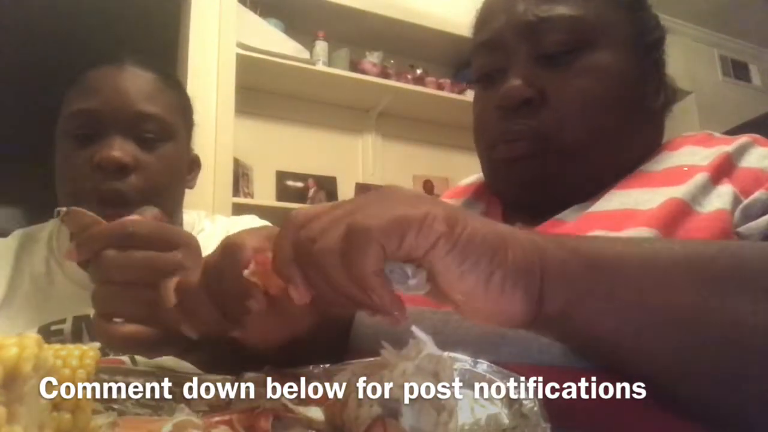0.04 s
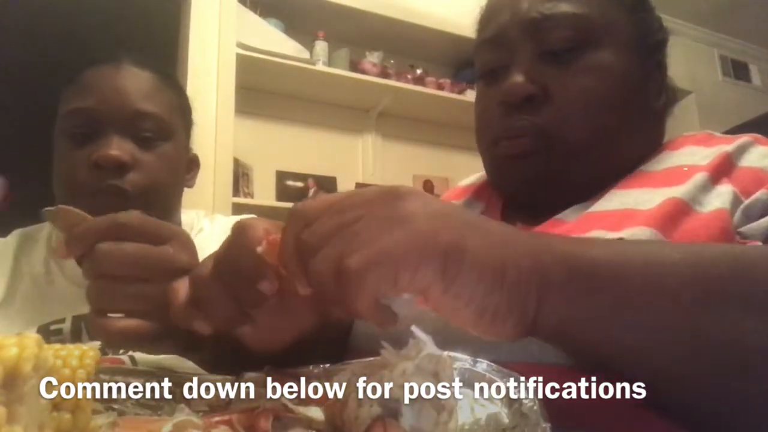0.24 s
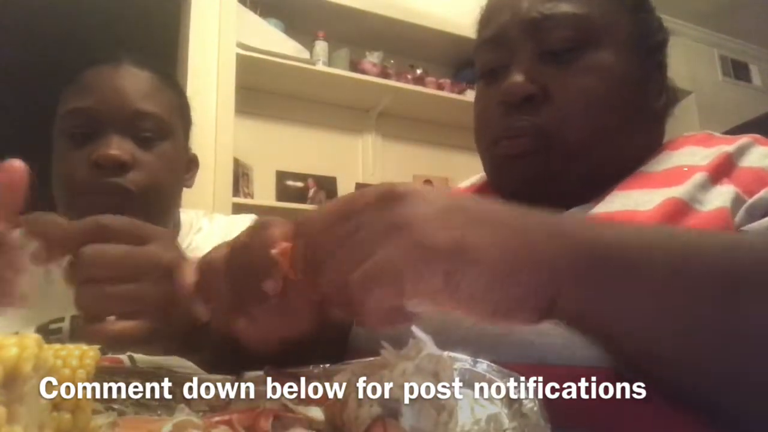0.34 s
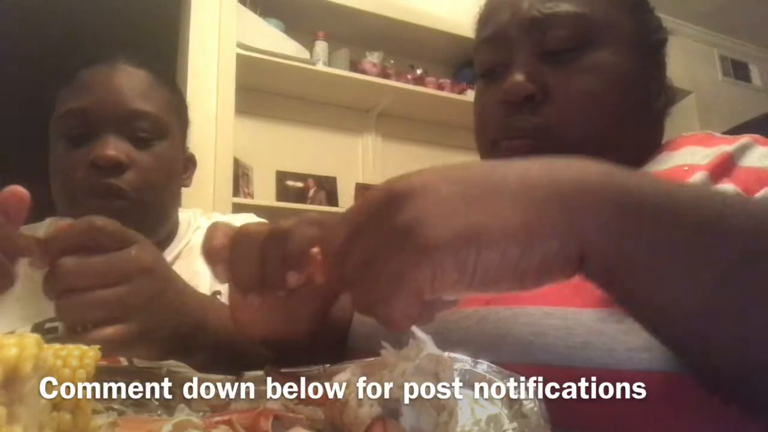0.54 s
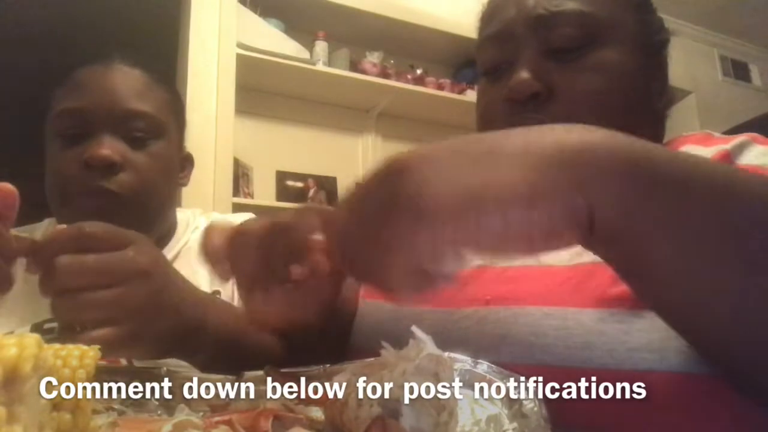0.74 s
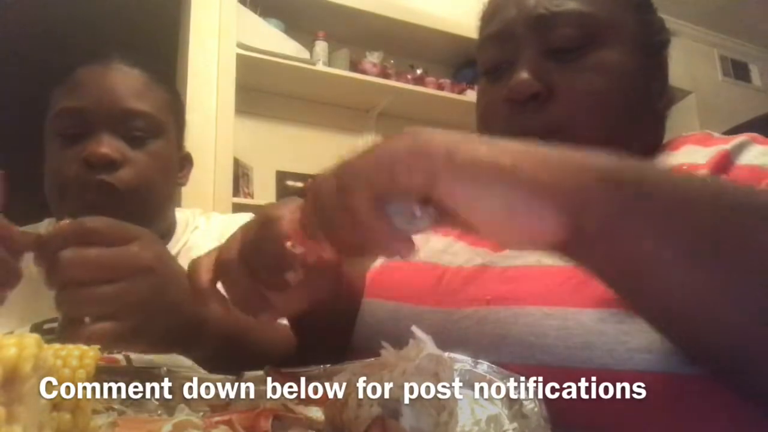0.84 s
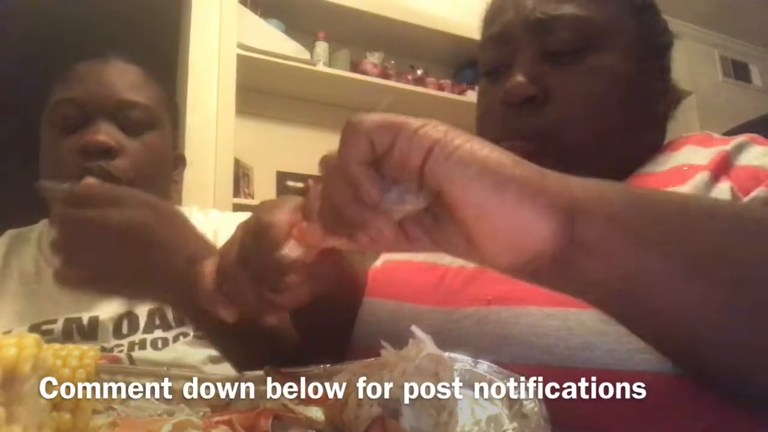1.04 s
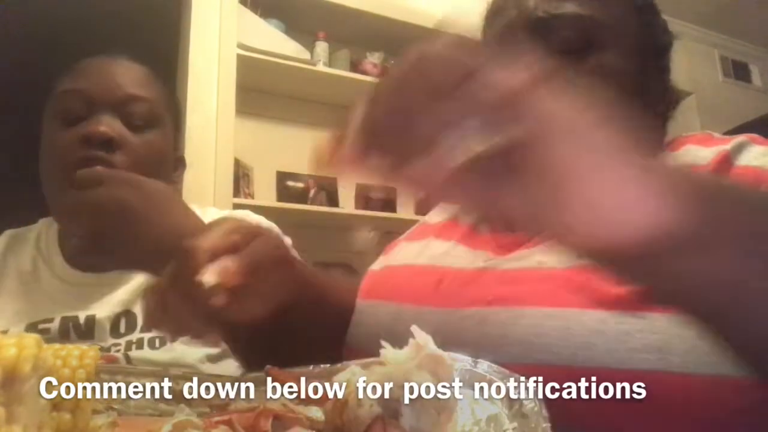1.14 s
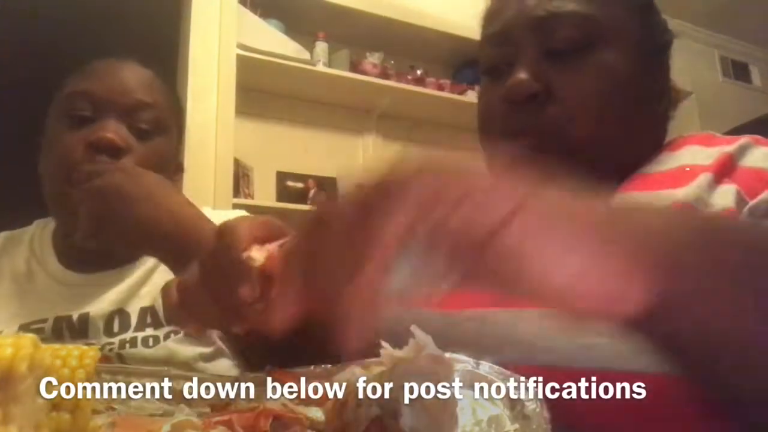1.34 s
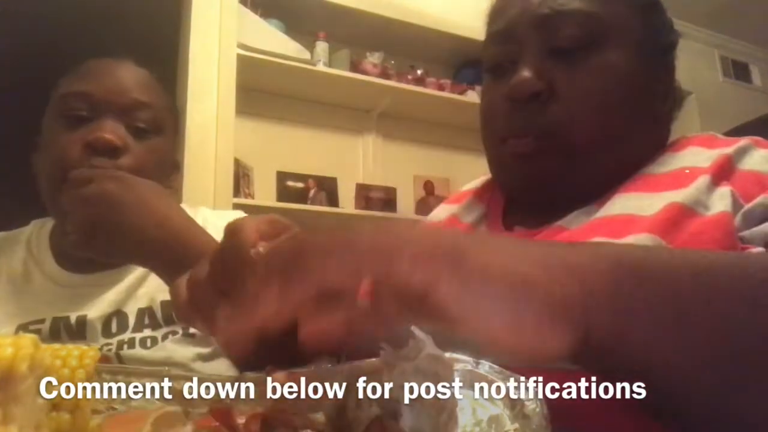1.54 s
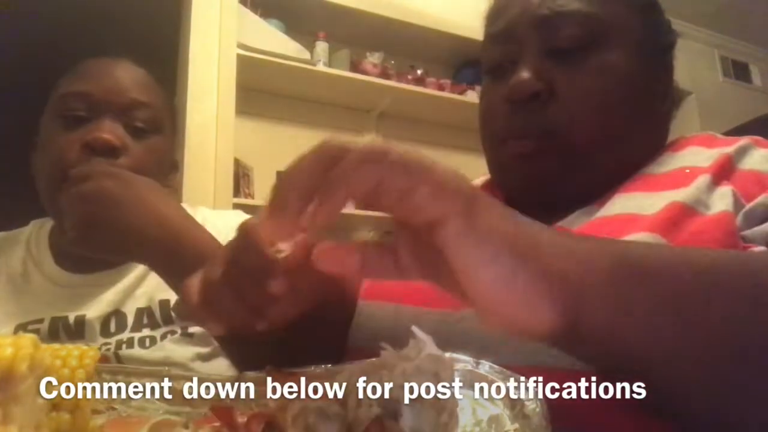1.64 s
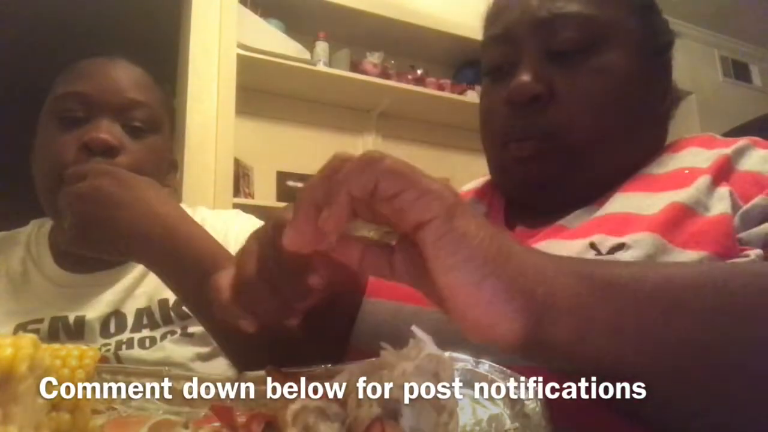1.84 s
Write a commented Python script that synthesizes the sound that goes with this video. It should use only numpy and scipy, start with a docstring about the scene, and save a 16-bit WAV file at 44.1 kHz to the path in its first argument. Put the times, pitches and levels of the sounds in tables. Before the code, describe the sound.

Crab-like shells snapped by hand at a table, one sharp double crack, later dropped bits clattering

```python
"""Shellfish shells cracked at a table

Shellfish shells snap in the fingers at a dining table, close to a phone; pieces drop onto a heap of shells.
Each snap or drop is a short run of noisy fractures ringing the shell; knocks on the table top are a few
dying cycles, and a puff of air sinks in pitch. Fingers and scraps rustle as tiny ticks on noise, and cloth
is plain shaped noise. A small room answers with fading noise, over a quiet hum and hiss."""
import sys
import numpy as np
from scipy import signal
from scipy.fft import rfft, irfft, next_fast_len
from scipy.io import wavfile
from scipy.ndimage import uniform_filter1d

SR = 44100
rng = np.random.default_rng(int(sys.argv[2]) if len(sys.argv) > 2 else 0)


def file_out(sig):
    """Save sig as 16-bit WAV at sys.argv[1]."""
    # one column per channel
    cols = np.atleast_2d(sig).T
    # limit, then scale
    lim = np.clip(cols, -1, 1)
    pcm = np.round(lim * 32767).astype(np.int16)
    wavfile.write(sys.argv[1], SR, pcm)


def invert_db(x):
    """Field ratio 10**(x/20) for x, a level in decibels (scalar or array-like)."""
    u = np.asarray(x, float) / 20
    return 10 ** u


N = 83790  # length in samples


def unit(x):
    """Scales a sound to an average (rms) level of 1."""
    return x / np.sqrt(np.mean(x ** 2) + 1e-20)


def along(points, hz):
    """Reads a curve of (Hz, value) points, with pitch on a log axis."""
    f, v = np.transpose(points)
    return np.interp(np.log(hz + 1), np.log(f + 1), v)


def coloured(x, points):
    """Filters a sound through a curve of (Hz, dB) points."""
    size = next_fast_len(len(x) + 8192)
    gain = invert_db(along(points, np.fft.rfftfreq(size, 1 / SR)))
    return irfft(rfft(x, size) * gain, size)[:len(x)]


def floor():
    """Steady room hiss, made of shaped noise, and mains hum, made of sine tones."""
    # Each row: pitch in Hz, level in dB; the shape of the hiss.
    hiss_colour = [(20, 1), (63, -1), (165, -2), (273, -3), (599, -10), (1650, -13.5), (2060, -20),
                   (3140, -19), (10200, -30.5), (15200, -29), (16500, -45.5)]
    # Each row: pitch of a hum tone in Hz, peak in dB.
    hum_tones = [(120, -69), (240, -69)]
    hiss_db = -62
    t = np.arange(N) / SR
    hum = sum(invert_db(db) * np.sin(2 * np.pi * hz * t) for hz, db in hum_tones)
    hiss = invert_db(hiss_db) * unit(coloured(rng.standard_normal(N), hiss_colour))
    return hiss + hum


def swells(s, length):
    """One row per event: it swells up to time s, holds for its length and dies away."""
    rise_s, fall_s = 0.038, 0.14  # fall_s: time to fall by 60 dB
    t = np.arange(N) / SR
    rise = np.clip((t - s) / rise_s + 1, 0, 1) ** 2
    return rise * invert_db(-60 * np.maximum(t - s - length, 0) / fall_s)


def grainy(rate, spread_db, smooth_db, clump_db):
    """Tiny random ticks (rate per second) on smooth noise, clumped into short patches of pitch."""
    sizes = invert_db(spread_db * rng.standard_normal(N))
    ticks = (rng.random(N) < rate / SR) * sizes * rng.standard_normal(N)
    mixed = unit(ticks) + invert_db(smooth_db) * rng.standard_normal(N)
    z = signal.stft(mixed, nperseg=128)[2]
    # random loudness patches, smoothed over pitch and then over time
    patches = uniform_filter1d(rng.standard_normal(z.shape), size=2, axis=0)
    patches = uniform_filter1d(patches, size=5, axis=1)
    return signal.istft(z * invert_db(clump_db * unit(patches)), nperseg=128)[1][:N]


def rustle():
    """Shell scraps crumble and fingers rub the table in tiny ticks; a sleeve's cloth hisses finely."""
    # Each row: start of the full level in seconds, hold in seconds, scraps in dB, fingers on the table in dB.
    rubs = [(0, 0.017, -68, -72.5), (0.338, 0.064, -57, -55.5), (0.426, 0.063, -63.5, -61),
            (0.763, 0.011, -67, -58.5), (0.919, 0.087, -83, -66.5), (1.063, 0.02, -70, -80),
            (1.137, 0.04, -65, -67.5), (1.294, 0.027, -62.5, -76), (1.435, 0.043, -45.5, -47.5),
            (1.579, 0.038, -42, -41), (1.642, 0.064, -50.5, -72), (1.751, 0.031, -48.5, -46),
            (1.806, 0.07, -57.5, -101)]
    # A sleeve brushes by. Each row: start of the full level in seconds, hold in seconds, level in dB.
    sleeve = [(0.33, 0.12, -62), (1.281, 0.029, -65), (1.446, 0.046, -62)]
    # Sound colours. Each row: pitch in Hz, level in dB per Hz.
    scraps_colour = [(530, -49), (900, -1.5), (1090, 4.5), (1460, 5), (1600, 5), (3340, 1.5), (5000, -3),
                     (5600, 2), (6300, -2), (10000, -18), (12000, -15), (16000, -22)]
    fingers_colour = [(71, -51.5), (120, -37), (360, -11.5), (771, -12), (1300, -25), (3300, -120)]
    cloth_colour = [(1500, -12), (4000, 7), (8500, -5), (13000, 3.5), (16000, -13)]
    s, length, scraps_db, fingers_db = np.transpose(rubs)[:, :, None]
    shape = swells(s, length)
    scraps = unit(coloured(grainy(4000, spread_db=5, smooth_db=4, clump_db=3), scraps_colour))
    scraps = (invert_db(scraps_db) * shape).sum(axis=0) * scraps
    fingers = unit(coloured(grainy(720, spread_db=7.5, smooth_db=5.5, clump_db=4.0), fingers_colour))
    fingers = (invert_db(fingers_db) * shape).sum(axis=0) * fingers
    s, length, cloth_db = np.transpose(sleeve)[:, :, None]
    cloth = unit(coloured(rng.standard_normal(N), cloth_colour))
    cloth = (invert_db(cloth_db) * swells(s, length)).sum(axis=0) * cloth
    return scraps + fingers + cloth


def room(x):
    """Each frequency of the room's answer dies at its own speed; a new tail every fifth of a second."""
    # How fast the answer dies. Each row: pitch in Hz, time to fall by 60 dB in seconds.
    decay = [(200, 0.76), (700, 0.53), (1800, 0.59), (4000, 0.66), (8000, 0.62), (15000, 0.43)]
    # Colour of the answer. Each row: pitch in Hz, level in dB.
    colour = [(300, 2.5), (1000, 1), (1900, 2), (5000, -2.5), (15000, 1)]
    out, step = np.zeros(N + 2 * SR), SR // 5
    for start in range(0, N, step):
        hz, t, z = signal.stft(rng.standard_normal(SR), SR, nperseg=256)
        level_db = along(colour, hz)[:, None] - 60 * t / along(decay, hz)[:, None]
        tail = signal.istft(z * invert_db(level_db), SR, nperseg=256)[1]
        tail *= 1 - np.exp(-np.arange(len(tail)) / SR / 0.0039)  # the answer builds up softly
        wet = signal.fftconvolve(x[start:start + step], tail / np.linalg.norm(tail))
        out[start:start + len(wet)] += wet
    return out[:N]


def ring(f, centre, width):
    """One resonance at a centre pitch: it sounds only after it is struck, and a narrow one rings longer."""
    return 1j * f * width / (centre ** 2 - f * f + 1j * f * width)


def fracture_run(t, run):
    """Noise of scattered strength for a run of breaks (in seconds), fading into a weak after-crackle."""
    spread_db, sag_db = 6, 2.5  # scatter of sizes; loss over the run
    fade_s, fade_per_run = 0.0035, 2.6  # 60 dB fade time after the run: fixed part, and part in runs
    shudder_db, shudder_runs = -9, 20.4  # weak after-crackle and its 60 dB fade time in runs
    chance = rng.standard_normal((2, len(t)))
    after = np.maximum(t - run, 0)
    fade = invert_db(-60 * after / (fade_s + fade_per_run * run))
    fade += invert_db(shudder_db - 60 * after / (shudder_runs * run))
    fade *= invert_db(-sag_db * np.minimum(t / run, 1))
    onset = np.minimum(t / 0.00046, 1)
    return onset * fade * chance[0] * invert_db(spread_db * chance[1])


def shell_body(f, hz):
    """The shell's resonances: those near the piece's pitch ring loudest, beside the piece's own ring."""
    # Resonances of the shell. Each row: pitch in Hz, width in Hz, level in dB.
    modes = [(1080, 216, 5.5), (1382, 160, 8), (1980, 936, 5), (3188, 400, 7), (3900, 870, 3.5),
             (5700, 140, -25.5), (8300, 320, -33), (12300, 490, -24)]
    off_pitch_db = 5  # loss per octave from the piece's pitch
    own_q, own_db = 16, 10.5  # sharpness and level of the piece's own ring
    thin_below_hz, dull_above = 187, 6  # bass loss; treble roll-off in multiples of the pitch
    body = invert_db(own_db) * ring(f, hz, hz / own_q)
    for k, (centre, width, db) in enumerate(modes):
        loss_db = off_pitch_db * abs(np.log2(centre / hz))
        body = body + (-1) ** k * invert_db(db - loss_db) * ring(f, centre, width)
    return body * (1j * f / (thin_below_hz + 1j * f)) ** 2 / (1 + 1j * f / (dull_above * hz))


def cracks(rows):
    """Runs of fractures ring the shell, and a bright crack rides on top.

    Row 0 reaches the phone; row 1, averaged over all directions and so of smoother colour, feeds the room."""
    size = 4096
    out = np.zeros((2, N + size))
    t, f = np.arange(size) / SR, np.fft.rfftfreq(size, 1 / SR)
    bright = ring(f, 9000, 16000) ** 2
    ending = np.clip(2 * (1 - np.arange(size) / size), 0, 1) ** 2  # closes the second half
    for s, db, hz, run_ms, bright_db in rows:
        run = run_ms / 1000
        fractures = rfft(fracture_run(t, run))
        # partly even out the peaks and dips of the noise's spectrum
        mean = np.sqrt(np.mean(abs(fractures) ** 2))
        fractures *= np.sqrt(mean / uniform_filter1d(abs(fractures), size=60))
        body = shell_body(f, hz)
        tone = irfft([fractures * body, mean * body])
        # the bright crack gets a further fade of its own
        early = rfft(irfft(fractures) * invert_db(-60 * t / (0.001696 + 1.1 * run)))
        early_mean = np.sqrt(np.mean(abs(early) ** 2))
        crack = irfft([early * bright, early_mean * bright])
        both = tone / abs(tone[0]).max() + invert_db(bright_db) * crack / abs(crack[0]).max()
        out[:, round(s * SR):][:, :size] += invert_db(db) * ending * both
    return out[:, :N]


def snaps():
    """Shells snap in the fingers: each break sets the piece ringing."""
    # Each row: start in seconds, peak of the ringing in dB, pitch of the piece in Hz,
    # length of the fracture run in milliseconds, bright crack in dB against the ringing.
    snap_rows = [(.1703, -14.5, 3900, 3.7, -26), (.1895, -3.5, 1293, 5.4, -45),
                 (.1947, -10.5, 1930, 1.1, -27), (.524, -47.5, 1840, 1.9, -12), (.575, -50, 2086, 4.1, 5),
                 (.752, -30, 3090, 0.81, 1.5), (.762, -46, 3010, 1.8, 3), (.848, -47, 3730, 0.45, 6),
                 (.8835, -31.5, 3900, 1.2, -2.5), (.949, -50.5, 970, 2.8, -6), (1.027, -34.5, 1480, 4.1, 5),
                 (1.028, -30.5, 4150, 1.84, 5.5), (1.034, -48, 2660, 1.2, 13), (1.041, -35, 3360, 1.1, -23),
                 (1.058, -47, 2840, 0.7, -19), (1.076, -46.5, 5700, 0.77, -3), (1.129, -48, 1690, 4.2, -30),
                 (1.138, -46.5, 2140, 10.4, -32.5), (1.22, -56, 5400, 1.1, -27)]
    return cracks(snap_rows)


def knocks():
    """Soft pushes on the table top: a few dying cycles."""
    # Each row: start in seconds, peak in dB, pitch in Hz.
    knock_rows = [(0.343, -42.5, 247), (0.385, -43.5, 360), (0.442, -42.5, 615), (0.463, -44.5, 700),
                  (0.57, -50.5, 280), (0.767, -40, 305), (0.782, -44.5, 390), (0.808, -54, 424),
                  (0.838, -50.5, 417), (0.945, -49, 219), (1.0798, -47, 720), (1.082, -50.5, 320),
                  (1.315, -52, 261), (1.32, -45.5, 610), (1.418, -36.5, 347), (1.4346, -23, 257.5),
                  (1.445, -30, 264), (1.553, -27, 241), (1.582, -25.5, 340), (1.592, -23, 403),
                  (1.629, -32.5, 400), (1.742, -43, 574), (1.752, -36.5, 555), (1.778, -39, 470),
                  (1.787, -39, 690), (1.797, -40, 560)]
    fade_cycles = 5.8  # cycles to fall by 60 dB
    out, t = np.zeros(N + SR), np.arange(SR // 10) / SR
    for s, db, hz in knock_rows:
        fade = invert_db(-60 * t * hz / fade_cycles)
        onset = 1 - np.exp(-t * hz * 4)
        push = np.gradient(fade * np.sin(2 * np.pi * hz * t) * onset)
        out[round(s * SR):][:len(t)] += invert_db(db) * push / abs(push).max()
    return out[:N]


def drops():
    """Pieces land and bounce on the heap, nearer the phone: each clatter rings the shell like a snap."""
    # Each row: start in seconds, peak of the ringing in dB, pitch of the piece in Hz,
    # length of the clatter in milliseconds, bright crack in dB against the ringing.
    drop_rows = [(1.425, -27.5, 3430, 1.5, -22), (1.4333, -9.5, 3290, 2.15, -18),
                 (1.4352, -13, 1980, 1.85, -19), (1.455, -46.5, 2540, 1.3, -19),
                 (1.466, -31.5, 3070, 1.2, -8), (1.48, -30.5, 2720, 6.1, -12), (1.494, -43, 2250, 1.3, -5),
                 (1.54, -26, 3560, 1.8, -26), (1.553, -20, 1410, 1.6, -17), (1.5555, -20, 1980, 2.6, -26),
                 (1.564, -31, 2550, 1.3, -25), (1.5775, -21, 2550, 1.7, -37), (1.582, -14, 2830, 2.6, -40),
                 (1.5855, -21.5, 2190, 1.6, 10), (1.592, -23, 1525, 5.4, -35), (1.613, -27, 1980, 4.8, -5),
                 (1.622, -33.5, 5700, 14, -11), (1.751, -32.5, 1950, 9.8, -24),
                 (1.765, -31.5, 1570, 7.3, -31), (1.766, -32, 5640, 6.4, -5), (1.799, -43.5, 2070, 5.9, -2)]
    return cracks(drop_rows)


def puff():
    """Air from the falling hand: one soft, low push that sinks in pitch."""
    start_s, length_s, peak_db = 1.59, 0.04, -45.5
    start_hz, sink_s = 130.7, 0.027  # the pitch halves after sink_s
    t = np.maximum(np.arange(N) / SR - start_s, 0)
    turns = start_hz * sink_s * np.log(1 + t / sink_s)
    swell = np.sin(np.pi * np.minimum(t / length_s, 1))
    return invert_db(peak_db) * swell * np.sin(2 * np.pi * turns)


def scene():
    """Adds all the sounds and the room's answer; near sounds are drier."""
    room_db, near_room_db = -14, -20
    snaps_direct, snaps_around = snaps()
    drops_direct, drops_around = drops()
    hands = knocks() + rustle()
    wet = room(invert_db(room_db) * snaps_around + invert_db(near_room_db) * (drops_around + hands))
    return (snaps_direct + drops_direct + hands + puff() + wet + floor())[None]


def phone_colour(x):
    """The phone's microphone loses the deepest bass; the same curve holds the phone's steep cut near 16 kHz."""
    # Each row: pitch in Hz, level in dB.
    response = [(25, -25), (45, 3), (100, -1), (250, 0.5), (15300, 0), (16200, -32.5)]
    return coloured(x, response)


def band_limit(x):
    """A steep low-pass at the top of the band."""
    return signal.sosfilt(signal.butter(12, 16660, fs=SR, output="sos"), x)


def record(dry):
    """The phone picks up the scene and gives it its own colour."""
    mix = phone_colour(dry[0])[None]
    return band_limit(mix)


dry = scene()
out = record(dry)
file_out(out)
```